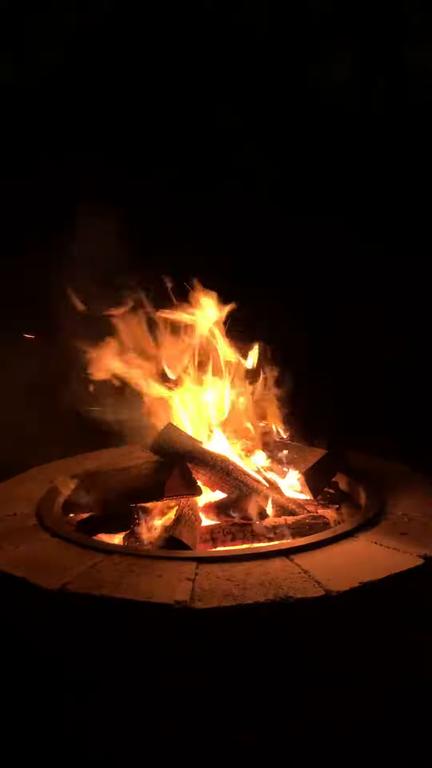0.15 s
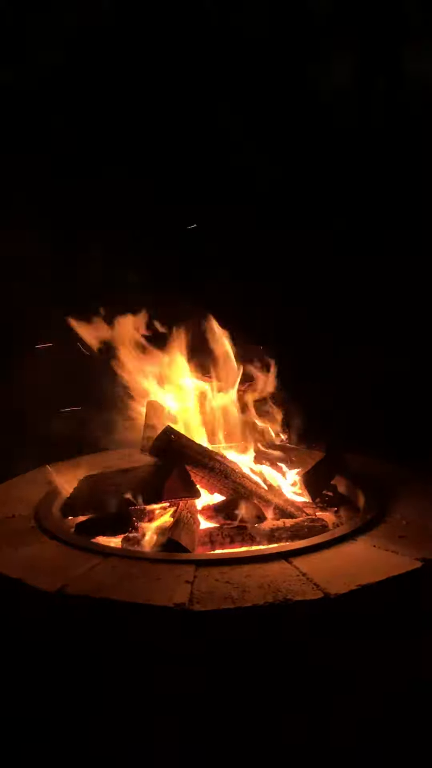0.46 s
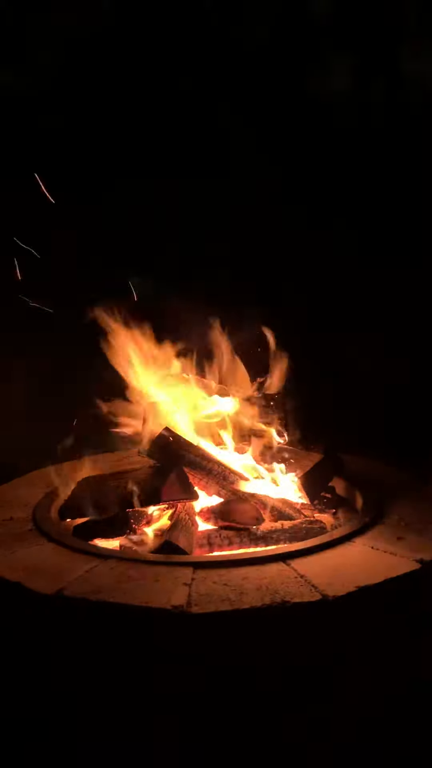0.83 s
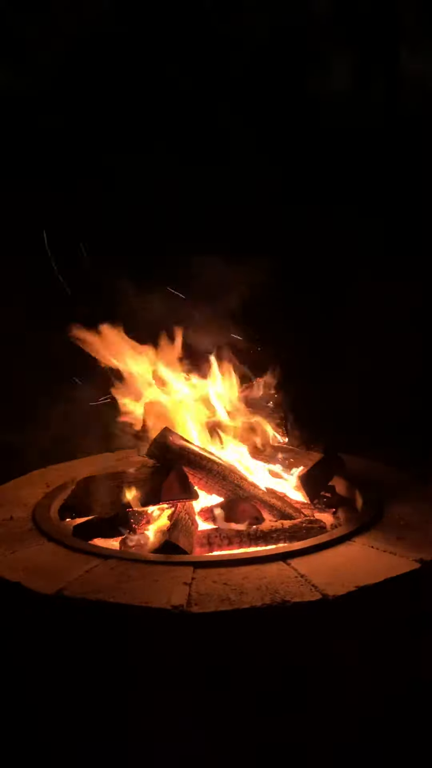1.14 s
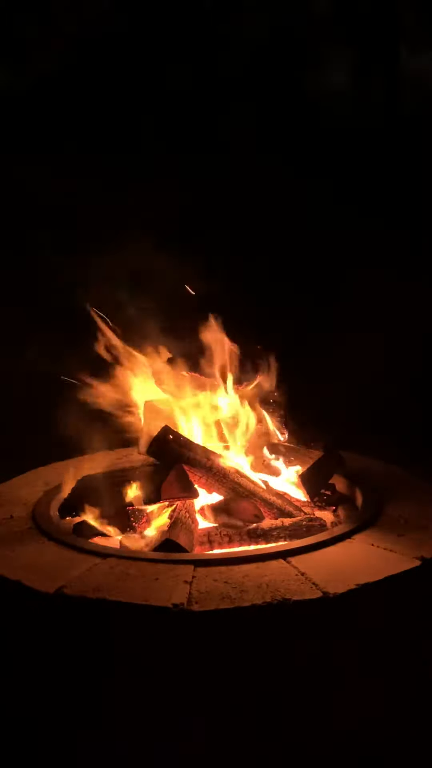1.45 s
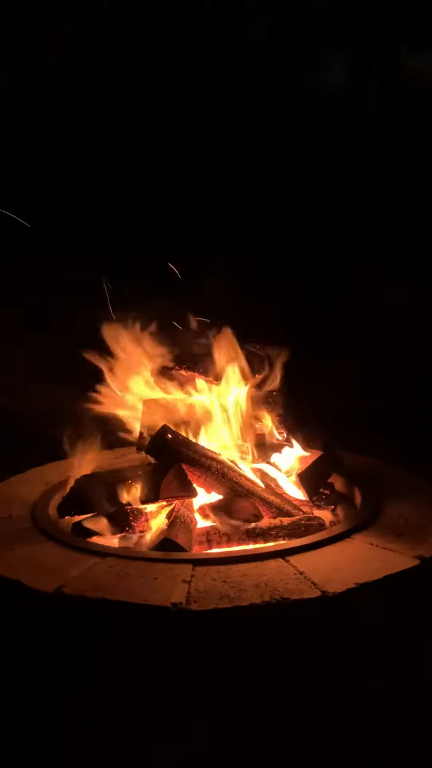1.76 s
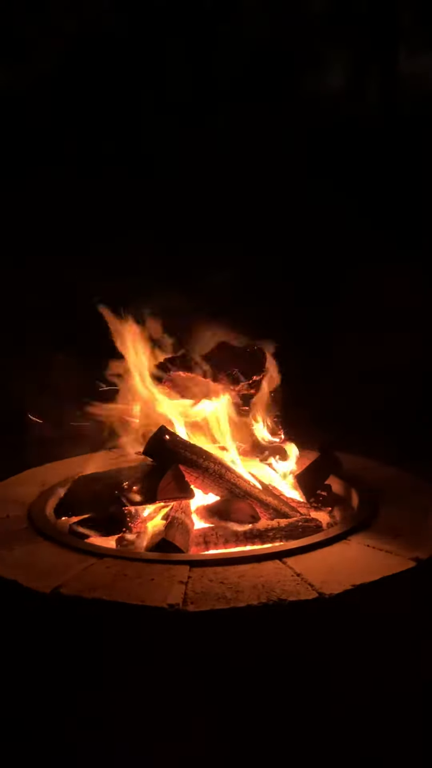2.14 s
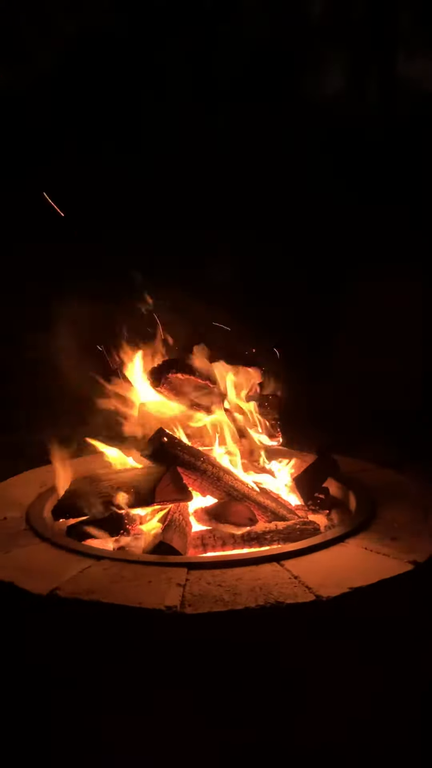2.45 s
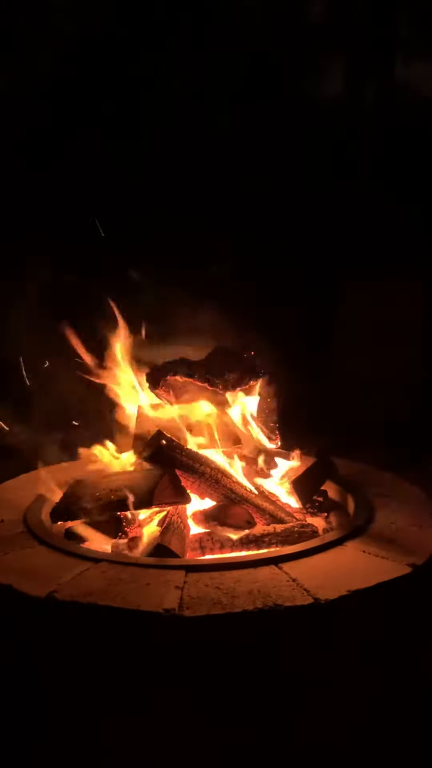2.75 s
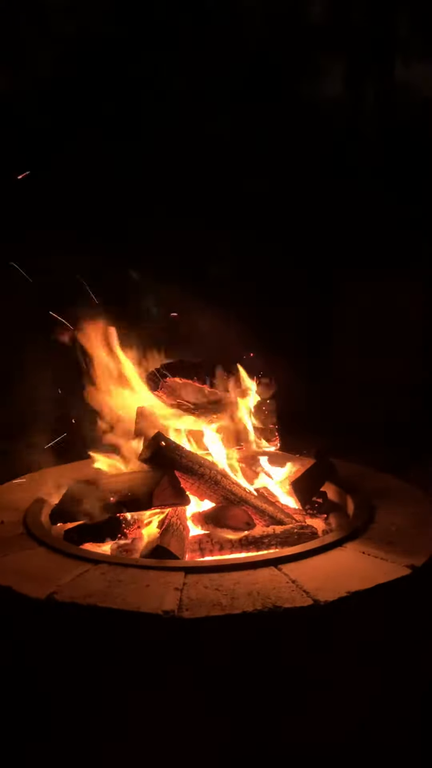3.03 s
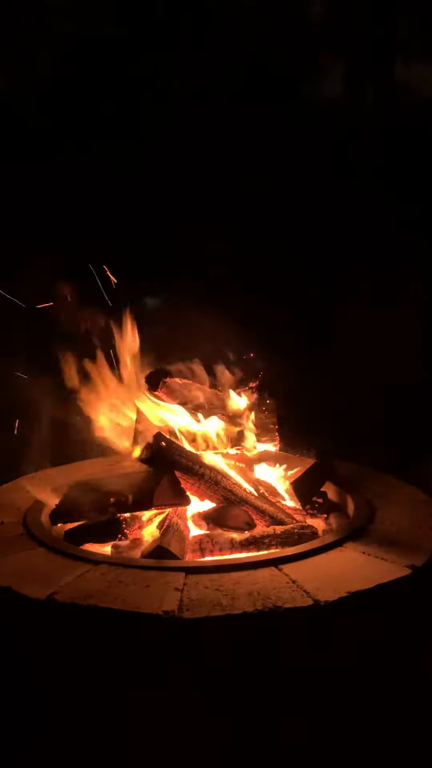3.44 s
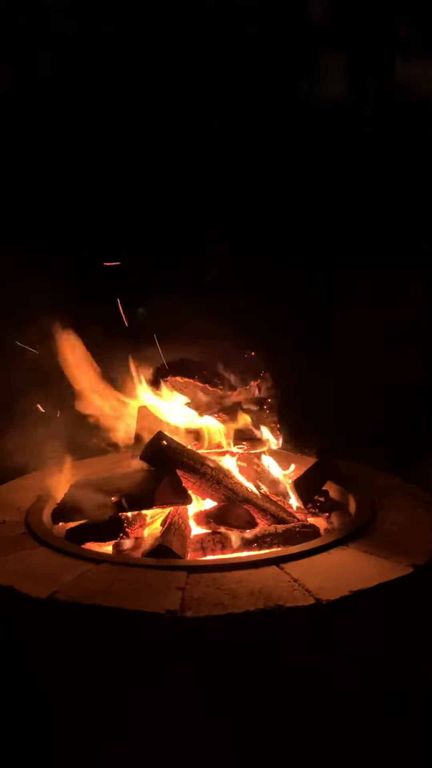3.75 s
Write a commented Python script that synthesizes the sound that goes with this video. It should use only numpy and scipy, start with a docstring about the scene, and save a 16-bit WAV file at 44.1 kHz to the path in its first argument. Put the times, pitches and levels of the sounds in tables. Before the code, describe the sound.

A wood fire crackles outdoors, close and dry, for about 3.9 seconds. Sharp bright pops cluster at 0.15-0.55, small ones follow at 1.1-1.9, the strongest snaps at 2.3, another at 2.9, then lesser ones to 3.8. Tiny ticks fill the gaps. Beneath, flames flutter in a soft uneven rumble, swelling near 1.6, with faint distant machine hum; thin hiss, very high whistles and sizzling spurts at 0.9, 3.3 and 3.6.

```python
"""A wood fire burns in a stone fire pit outdoors at night, heard through two microphone ports.
Short decaying rings and impulses make its pops and ticks; wavering sines make the thin whistles of steam.
Patchy coloured noise is the hiss and sizzle of the logs, and low noise the flutter and wash of the flames.
A low throb swells within the rumble, and steady tones are a machine humming in the distance.
The fire's treble reaches the left microphone port slightly before the right."""
import sys
import numpy as np
from scipy import signal
from scipy.fft import rfft, irfft, next_fast_len
from scipy.io import wavfile
from scipy.ndimage import uniform_filter1d, map_coordinates

SR = 44100
rng = np.random.default_rng(int(sys.argv[2]) if len(sys.argv) > 2 else 0)


def materialize(psi):
    """Save the field psi as 16-bit PCM at rate SR to the path in sys.argv[1].

    A 1-D psi becomes a single channel; in a 2-D psi each row is a channel.
    """
    bounded = np.clip(np.atleast_2d(psi).T, -1, 1)
    quanta = np.round(bounded * 32767).astype(np.int16)
    wavfile.write(sys.argv[1], SR, quanta)


N = 171549  # length of the scene in samples

# Colours hold relative levels: the coloured sound is brought to rms 1 before its own level is applied.

# Tones of the distant machine: (frequency [Hz], mean level [dB])
MACHINE_TONES = [(212.7, -60.5), (255.6, -57.5), (274.5, -64), (297.6, -61), (340.5, -70.5), (413.2, -66),
                 (510.3, -67), (707.9, -68.5), (884, -70.5), (1002.6, -66.5), (1226, -78.5), (1592, -84),
                 (2565, -78)]
# Lowest tone of the machine, before DRONE_TRIM_DB: (time [s], level [dB])
DRONE_SWELL = [(0.0, -31.5), (0.05, -43), (0.51, -46.5), (0.66, -36.5), (0.92, -45.5), (1.57, -39),
               (1.84, -55), (1.87, -38.5), (2.09, -65), (2.38, -38), (2.6, -47), (2.81, -40.5), (3.8, -45),
               (3.89, -56)]
DRONE_HZ, DRONE_TRIM_DB = 58.94, -1.05
TONE_WAVER_DB, TONE_DRIFT_RAD = 1.5, 0.53

# Low throb within the rumble, before THROB_TRIM_DB: (time [s], level [dB])
THROB_SWELL = [(0.0, -53), (0.29, -39.5), (0.32, -53), (0.37, -38), (0.52, -48.5), (0.66, -37.5),
               (0.87, -44), (1.39, -40), (1.41, -47), (1.51, -41), (1.65, -50), (1.68, -62), (1.73, -41),
               (1.95, -49), (1.98, -37), (2.23, -45), (2.43, -38.5), (2.49, -55), (2.57, -40), (2.76, -52),
               (2.89, -41.5), (2.91, -60), (3.12, -36), (3.14, -50), (3.3, -40), (3.89, -44)]
THROB_HZ, THROB_WAVER_HZ, THROB_TRIM_DB = 106.56, 3.5, -3.5

# Colour of the steady wash of flames and night air: (frequency [Hz], relative level [dB])
WASH_COLOUR = [(22, -31), (45, -5.5), (130, -3), (200, -0.5), (300, -5), (450, -8), (680, -7.5),
               (850, -12.5), (1100, -12), (1600, -19), (2600, -24), (4000, -33.5), (7000, -122)]
# How alike the wash is at the two ports: (frequency [Hz], left-right likeness [1 = identical])
WASH_LIKENESS = [(100, 0.87), (250, 1), (500, 0.79), (1000, 0.64), (2000, 0.68), (3500, 0.29)]
WASH_DB = -48
# Colour of the low flutter of the flames: (frequency [Hz], relative level [dB])
FLUTTER_COLOUR = [(20, -44), (32, -24), (48, -1), (65, -3.5), (80, 3.5), (100, 2.5), (125, -4.5),
                  (150, -9.5), (300, -27.5), (900, -55)]
# Rise and fall of the flutter, before FLUTTER_TRIM_DB: (time [s], level [dB])
FLUTTER_SWELL = [(0.0, -46.5), (0.46, -40), (0.49, -50), (0.65, -40), (1.19, -41.5), (1.38, -42.5),
                 (1.41, -48), (1.53, -38), (1.59, -52), (1.64, -33), (1.68, -65), (1.73, -36),
                 (1.95, -44.5), (1.98, -37.5), (2.23, -41), (2.98, -43.5), (2.99, -41), (3.89, -40.5)]
FLUTTER_TRIM_DB = -1.5

# Colour of the steady steam hiss: (frequency [Hz], relative level [dB])
HISS_COLOUR = [(2200, -17), (3300, -3), (4200, 3), (5100, 5.5), (6400, -2), (7500, -9), (8200, -4),
               (8800, 1), (9500, -3), (10200, 0), (10800, -4.5), (12000, 3.5), (14000, 4), (14950, -1.5),
               (15700, -2), (15950, -45)]
HISS_DB, HISS_PATCHY_DB = -61, 4
# Steam sizzling from a log end, before SIZZLE_RANGE and SIZZLE_TRIM_DB: (time [s], level [dB])
SIZZLE_SPURTS = [(0, -70), (0.12, -59), (0.22, -75), (0.83, -71), (0.88, -50.5), (1.0, -58), (1.15, -65),
                 (1.9, -64.5), (2.52, -66), (2.6, -60), (2.82, -60), (3.05, -57), (3.33, -53), (3.5, -66),
                 (3.62, -51.5), (3.76, -63), (3.87, -61)]
# Colour of the sizzle: (frequency [Hz], relative level [dB])
SIZZLE_TINT = [(9000, -56), (11300, -22), (12300, -4), (13150, -5), (13700, -11), (15000, -66)]
SIZZLE_TRIM_DB, SIZZLE_PATCHY_DB = -3.5, 5
SIZZLE_RANGE = 0.86  # scales the dB distance of each spurt below the loudest

# Steam whistling through a crack, before WHISTLE_TRIM_DB: (time [s], pitch [Hz], level [dB])
WHISTLE_GLIDE = [(0.02, 14200, -64), (0.27, 14100, -63), (0.34, 14300, -60), (0.55, 14400, -63),
                 (0.7, 14100, -61), (0.85, 13975, -69), (0.96, 14000, -80), (1.12, 14025, -61),
                 (1.3, 14200, -62), (1.4, 14300, -62), (1.45, 14650, -57), (1.51, 14300, -60),
                 (1.56, 14200, -90)]
WHISTLE_TRIM_DB, WHISTLE_WAVER_HZ, WHISTLE_ROUGH_HZ = -3, 44.9, 115
# Fainter, short whistles: (start [s], length [s], pitch [Hz], level at the height of the swell [dB])
SHORT_WHISTLES = [(1.52, 0.46, 15650, -75), (1.715, .14, 11670, -66), (2.1, 0.91, 13300, -77),
                  (2.28, 0.47, 15650, -72), (2.7, 0.77, 11200, -71)]

# Pops of the wood: (time [s], ring pitch [Hz], ring level [dB], crack level [dB], knock level [dB])
POPS = [(0.1469, 13400, -40, -44, -42), (0.2548, 10000, -49, -48, -55), (0.3013, 12800, -53, -68, -72),
        (0.3314, 14000, -46, -44, -49), (0.4051, 6500, -57, -51, -58), (0.555, 6500, -60, -62, -62),
        (1.1107, 8500, -58, -56, -68), (1.3339, 7900, -54, -56, -55), (1.4696, 4800, -51, -62, -59),
        (1.5064, 6500, -59, -64, -67), (1.8852, 7000, -61, -58, -68), (2.3132, 13800, -47, -51, -65),
        (2.3147, 11600, -32.7, -44, -42.5), (2.8833, 13500, -55, -58, -65),
        (2.8982, 12100, -42.5, -52, -60), (3.1541, 5000, -51, -58, -59), (3.2209, 5800, -47, -46.5, -70),
        (3.2224, 6500, -55, -52, -70), (3.3157, 9500, -51, -55, -70), (3.7738, 6700, -53, -54, -60)]
# Scatter of a pop, from the logs and from the stone rim: (energy [dB], time to fall 60 dB [s])
POP_SCATTER = [(-12, .008), (-17.5, .08)]
# Colour of the bright crack: (frequency [Hz], relative level [dB])
CRACK_COLOUR = [(1000, -18), (4300, 3), (7800, -3), (11000, 0), (14500, -1), (17500, -18)]
# Colour of the woody knock: (frequency [Hz], relative level [dB])
KNOCK_COLOUR = [(300, -20), (900, 0), (2000, -1), (3400, 1), (4600, -7), (7000, -22)]
RING_RISE_CYCLES, RING_FALL_CYCLES = 1.5, 12  # the fall is by 60 dB
SCATTER_RISE_S, SPLINTER_T60_S = .001, .008
TICKS_PER_S, FAINTEST_TICK_DB, TICK_SPREAD_DB = 18, -69.5, 1.7
TICK_LOW_HZ, TICK_HIGH_HZ = 4500, 13500

# Left port over right port: (frequency [Hz], level difference [dB])
LEFT_OVER_RIGHT = [(40, -0.5), (125, 1.4), (280, 2.5), (600, 1.6), (1000, 0.3), (1500, -1), (2500, 0)]
PORT_LAG_S, LAG_FROM_HZ, PORT_LINGER_RAD = .000235, 2570, .36
TOP_HZ = 16500  # band limit


def amp(db):
    """Gain of a level in dB."""
    return 10 ** (np.asarray(db) / 20)


def unit(x):
    """x at rms 1."""
    return x / np.sqrt(np.mean(x ** 2) + 1e-20)


def along(points, hz):
    """(frequency [Hz], value) points read on a log frequency axis."""
    f, v = np.transpose(points)
    return np.interp(np.log(hz + 1), np.log(f + 1), v)


def curves(rows):
    """One value per sample for each column after the time."""
    s, *cols = np.transpose(rows)
    return [np.interp(np.arange(N) / SR, s, c) for c in cols]


def wobble(rate):
    """A smooth random curve through rate knots a second."""
    knots = rng.standard_normal(int(N * rate / SR) + 4)
    return map_coordinates(knots, [np.arange(N) * rate / SR])


def filtered(x, response):
    """x times a complex response of frequency."""
    n = x.shape[-1]
    m = next_fast_len(n + n // 4)
    return irfft(rfft(x, m) * response(np.fft.rfftfreq(m, 1 / SR)), m)[..., :n]


def coloured(x, colour):
    """x shaped by a colour, at rms 1."""
    return unit(filtered(x, lambda hz: amp(along(colour, hz))))


def rush(colour, alike):
    """Stereo noise of rms 1 with a left-right likeness for each frequency."""
    def mid_side_gains(hz):
        turn = np.arccos(np.clip(along(alike, hz), -1, 1)) / 2
        return np.array([np.cos(turn), np.sin(turn)])

    mid, side = filtered(rng.standard_normal((2, N)), mid_side_gains)
    return coloured(np.array([mid + side, mid - side]), colour)


def patchy(x, depth_db):
    """x with brief random swells and dips in narrow bands, at rms 1."""
    z = signal.stft(x, nperseg=512)[2]
    field = rng.standard_normal(z.shape[1:])
    field = uniform_filter1d(field, size=4, axis=0)  # across frequency
    field = uniform_filter1d(field, size=9, axis=1)  # across time
    return unit(signal.istft(z * amp(depth_db * unit(field)), nperseg=512)[1][:, :N])


def impulse(colour, size):
    """A single sharp minimum-phase impulse with the given colour, at rms 1."""
    cepstrum = irfft(np.log(amp(along(colour, np.fft.rfftfreq(size, 1 / SR)))), size)
    causal = 2 * cepstrum[:size // 2]
    return unit(irfft(np.exp(rfft(causal, size)), size))


def add(track, s, sound):
    """Mix a sound into the track at time s."""
    part = track[..., max(0, round(s * SR)):][..., :sound.shape[-1]]
    part += sound[..., :part.shape[-1]]


def machine():
    """A low swelling drone and higher tones that waver on their way through the air."""
    t = np.arange(N) / SR

    def tone(hz, port_phases):
        drift = TONE_DRIFT_RAD * wobble(4.09)
        return unit(np.sin(2 * np.pi * hz * t + drift + port_phases))

    drone_db, = curves(DRONE_SWELL)
    track = amp(drone_db + DRONE_TRIM_DB) * tone(DRONE_HZ, np.zeros((2, 1)))
    for hz, db in MACHINE_TONES:
        port_phases = rng.normal(0, 0.24, (2, 1))
        track += amp(db + TONE_WAVER_DB * wobble(4.2)) * tone(hz, port_phases)
    return track


def throb():
    """A low throb of unsteady pitch that swells and drops out within the rumble."""
    db, = curves(THROB_SWELL)
    hz = THROB_HZ + THROB_WAVER_HZ * wobble(22)
    return amp(db + THROB_TRIM_DB) * unit(np.sin(2 * np.pi * np.cumsum(hz) / SR))


def flames():
    """Low flutter, the same at both ports, under a steady broad wash."""
    db, = curves(FLUTTER_SWELL)
    flutter = amp(db + FLUTTER_TRIM_DB) * rush(FLUTTER_COLOUR, [(100, 1.0)])
    wash = amp(WASH_DB + 1.2 * wobble(2.28)) * rush(WASH_COLOUR, WASH_LIKENESS)
    return flutter + wash


def hiss():
    """Steam leaves the logs in a steady grainy hiss."""
    level_db = HISS_DB + 1.3 * wobble(6.09) + 0.47 * wobble(450)
    return amp(level_db) * patchy(rush(HISS_COLOUR, [(5000, 1.0)]), HISS_PATCHY_DB)


def sizzle():
    """Sap boils at a log end in spurts of narrow, high noise."""
    level_db, = curves(SIZZLE_SPURTS)
    spurt_db = level_db.max() + SIZZLE_RANGE * (level_db - level_db.max())
    boil = patchy(rush(SIZZLE_TINT, [(13000, 1.0)]), SIZZLE_PATCHY_DB)
    return amp(SIZZLE_TRIM_DB + spurt_db + 0.85 * wobble(490)) * boil


def jet(pitch_hz):
    """The unsteady, breathy tone of a steam jet: slow and fast pitch wander, flickering level."""
    hz = pitch_hz + WHISTLE_WAVER_HZ * wobble(35) + WHISTLE_ROUGH_HZ * wobble(900)
    return unit(np.sin(2 * np.pi * np.cumsum(hz) / SR) * amp(2.0 * wobble(130)))


def whistles():
    """Steam jets: one long gliding whistle and several short faint ones that swell and fade."""
    pitch_hz, db = curves(WHISTLE_GLIDE)
    track = amp(db + WHISTLE_TRIM_DB) * jet(pitch_hz)
    for s, length, hz, db in SHORT_WHISTLES:
        progress = np.clip((np.arange(N) / SR - s) / length, 0, 1)
        track += amp(db) * np.sin(np.pi * progress) * jet(hz)
    return track


def scatter_paths(t):
    """Decaying noise echoes of a pop from the logs and the stone rim."""
    paths = np.zeros(len(t))
    for energy_db, t60 in POP_SCATTER:
        envelope = (1 - np.exp(-t / SCATTER_RISE_S)) * amp(-60 * t / t60)
        paths += amp(energy_db) * unit(rng.standard_normal(len(t)) * envelope)
    return paths / np.sqrt(len(t))


def pop(ring_hz, ring_db, crack_db, knock_db):
    """A pocket of steam bursts: wood cracks and splinters, the log knocks, the split rings; all scatters."""
    t = np.arange(SR // 25) / SR
    cycles = ring_hz * t
    ring_envelope = (1 - np.exp(-cycles / RING_RISE_CYCLES)) * amp(-60 * cycles / RING_FALL_CYCLES)
    ring = unit(np.sin(2 * np.pi * cycles) * ring_envelope)
    splinter_noise = coloured(rng.standard_normal(len(t)), CRACK_COLOUR)
    splinters = unit(splinter_noise * amp(-60 * t / SPLINTER_T60_S))
    crack = unit(impulse(CRACK_COLOUR, len(t)) + splinters)
    knock = impulse(KNOCK_COLOUR, len(t))
    burst = amp(ring_db) * ring + amp(crack_db) * crack + amp(knock_db) * knock
    heard = burst + signal.fftconvolve(burst, scatter_paths(t))[:len(t)]
    return heard / np.sqrt(20)  # levels refer to a 2 ms span, a twentieth of the whole


def crackle():
    """The clear pops of the wood, and faint ticks at random times among them."""
    track = np.zeros(N)
    for s, ring_hz, ring_db, crack_db, knock_db in POPS:
        add(track, s, pop(ring_hz, ring_db, crack_db, knock_db))
    for when, size, tone in rng.random((int(TICKS_PER_S * N / SR), 3)):
        db = FAINTEST_TICK_DB - TICK_SPREAD_DB * np.log(1 - size)  # few ticks are loud
        ring_hz = TICK_LOW_HZ + tone * (TICK_HIGH_HZ - TICK_LOW_HZ)
        add(track, when * N / SR, pop(ring_hz, db, db - 16, db - 17))
    return track


def port_phase(hz):
    """The left port's lead in radians; it lingers where the two ports are in step or opposed."""
    phase = 2 * np.pi * PORT_LAG_S * np.maximum(hz - LAG_FROM_HZ, 0)
    return phase - PORT_LINGER_RAD * np.sin(2 * phase)


def scene():
    """All sources at the two ports: treble arrives earlier on the left, most low sound leans left in level."""
    air = machine() + throb() + flames() + hiss() + sizzle() + whistles() + crackle()
    sides = np.array([[.5], [-.5]])  # half of each difference goes to each port

    def ports(hz):
        return np.exp(1j * sides * port_phase(hz)) * amp(sides * along(LEFT_OVER_RIGHT, hz))

    return filtered(air, ports)


def record(dry):
    """Nothing is kept above the band limit."""
    return filtered(dry, lambda hz: hz < TOP_HZ)


dry = scene()
out = record(dry)
materialize(out)
```